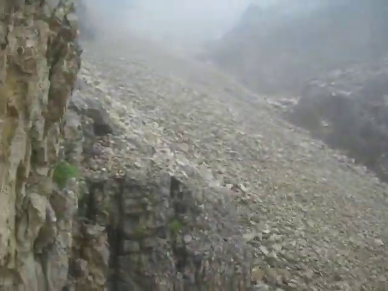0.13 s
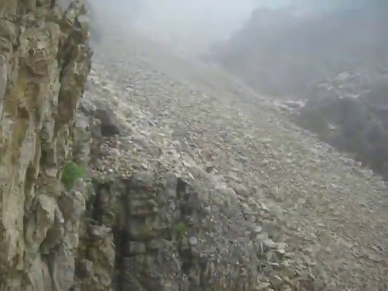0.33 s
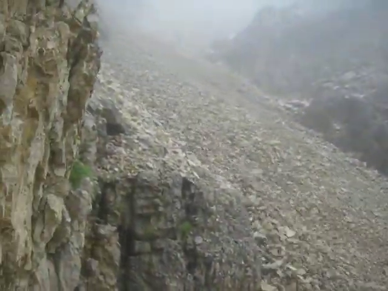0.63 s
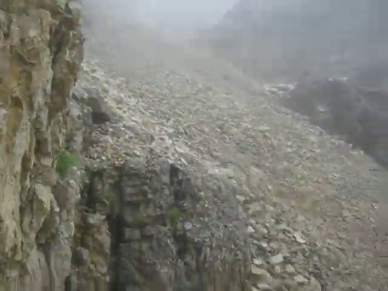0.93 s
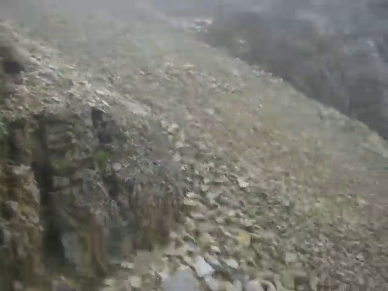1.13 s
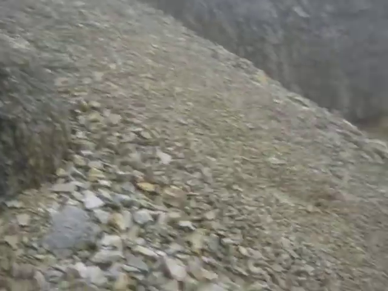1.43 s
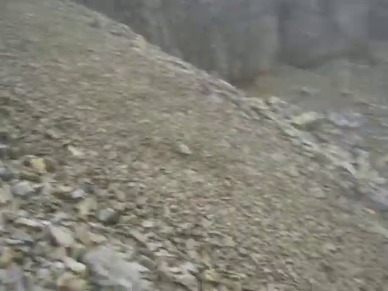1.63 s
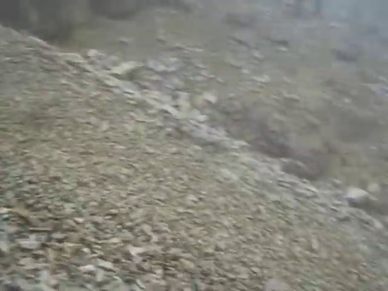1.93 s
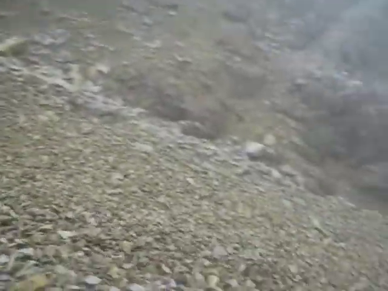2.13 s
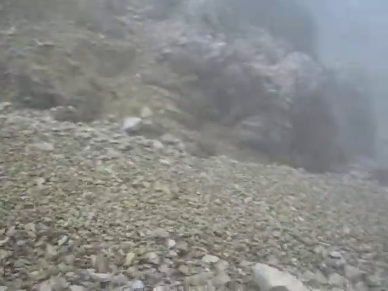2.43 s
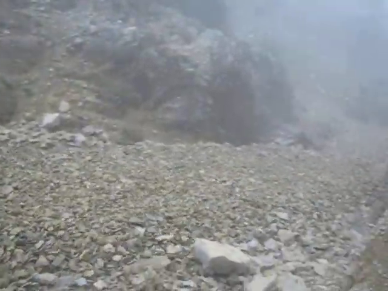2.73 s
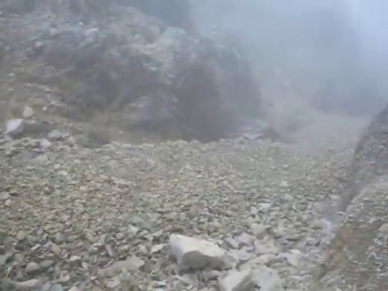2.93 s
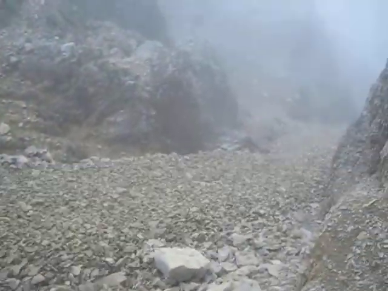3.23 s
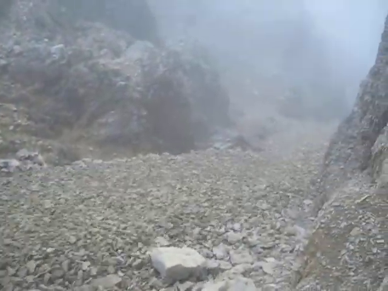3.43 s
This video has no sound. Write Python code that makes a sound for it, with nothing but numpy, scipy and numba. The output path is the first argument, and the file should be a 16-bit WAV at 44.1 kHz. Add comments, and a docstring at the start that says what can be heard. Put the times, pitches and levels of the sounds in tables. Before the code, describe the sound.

Scree slides down a mountain gully, small stones rattling and hissing over a faint rumble.

```python
"""A surging hiss and clatter: loose limestone scree sliding down a steep gully.
Thousands of small chips and fewer fist-sized stones knock and bounce, each ringing for milliseconds,
and merge with the hiss of the far slope. Heavy blocks thud in the bed over a low rumble.
A small camera's mono microphone hears it with little treble, turning towards the coarser stones below.
One thin, bright tick stands out."""
import sys
import numpy as np
from scipy import signal
from scipy.fft import rfft, irfft
from scipy.io import wavfile
from numba import njit

SR = 44100
rng = np.random.default_rng(int(sys.argv[2]) if len(sys.argv) > 2 else 0)


def to_wav(s):
    """Save 16-bit WAV."""
    ch = np.atleast_2d(s).T  # columns
    pcm = np.round(np.clip(ch, -1, 1) * 32767)  # PCM
    wavfile.write(sys.argv[1], SR, pcm.astype(np.int16))


N = 157437

# Modes of a flat stone: ratio to its pitch, level/dB
FLAT_STONE_MODES = [(.62, -3.5), (1, 2), (1.37, -2.5), (1.83, -7.5)]


def chips(level_db=-3):
    """Small chips in the gully: a bright, dense rattle whose level flickers slightly."""
    # Rattle colour at the microphone: f/Hz, gain/dB
    chip_colour = [(400, -23.5), (1000, -12), (2000, -4.5), (2800, -3), (3600, 0), (4700, 2.5), (5200, 1.5),
                   (5550, -2.5), (5900, -15.5), (6300, -43.5)]
    rattle = tumble(per_s=6000, low_hz=594, high_hz=6484, t60_s=.009, spread_db=3)
    return undb(level_db) * colour(rattle, chip_colour) * undb(.38 * wander(per_s=70))


def stones(level_db=-5):
    """Fist-sized stones: a lower clatter that grows as the microphone turns to the foot of the slope."""
    # Clatter colour at the microphone: f/Hz, gain/dB
    stone_colour = [(150, -18), (350, -17), (580, -8), (750, -10), (950, -6.5), (1400, -6.5), (2400, 1),
                    (3300, 1), (4500, -4), (6000, -37)]
    # Share of the larger stones in the flow: t/s, relative level/dB
    coarse_share = [(0, -1), (.5, -2), (.95, -3.5), (1.3, -3.5), (1.9, -1.5), (2.3, 0.5), (2.8, 3),
                    (3.15, 2.2), (3.57, 1.5)]
    clatter = tumble(per_s=3000, low_hz=250, high_hz=4490, t60_s=.011, spread_db=2)
    flicker = undb(.29 * wander(per_s=40))
    return undb(level_db) * colour(clatter, stone_colour) * curve(coarse_share) * flicker


def tumble(per_s, low_hz, high_hz, t60_s, spread_db, longest_hop_s=.025, bounce_db=-2.5):
    """A stream of stones of random size and distance; each strikes, hops and strikes again more softly."""
    when, pitch, damping, force, hop = rng.random((int(per_s * N / SR), 5)).T
    times = when * N / SR
    hz = low_hz + (high_hz - low_hz) * pitch
    decay_s = t60_s * 2 ** (2 * damping - 1)
    strength = undb(spread_db * np.minimum(-np.log(1 - force), 4))  # many soft, few hard
    strikes = knocks(times, hz, decay_s, strength)
    bounces = knocks(times + longest_hop_s * hop, hz, decay_s, strength)
    return strikes + undb(bounce_db) * bounces


def knocks(times, hz, t60_s, strength):
    """Struck stones: each rings in its own slightly irregular set of modes."""
    out = np.zeros(N)
    for ratio, db in FLAT_STONE_MODES:
        detune = 1 + .047 * rng.uniform(-.9, 1, len(times))
        polarity = rng.choice([-1, 1], len(times))
        out += ring(times, hz * ratio * detune, t60_s, strength * undb(db) * polarity)
    return out


@njit
def ring(times, hz, t60_s, strength):
    """One mode dying away: a damped sine for each contact."""
    out = np.zeros(N)
    for k in range(len(times)):
        start = int(times[k] * SR)
        pole = np.exp((2j * np.pi * hz[k] - np.log(1000) / t60_s[k]) / SR)
        phasor = strength[k] + 0j
        for i in range(start, min(N, start + int(t60_s[k] * SR))):
            out[i] += phasor.imag
            phasor *= pole
    return out


def thuds(rise_s=.0054, t60_s=.053, gain_db=1.5):
    """Heavy blocks land softly in the bed, their low modes quickly damped."""
    # Landings: t/s, relative level/dB, f/Hz
    landings = [(1.511, -32, 113), (1.672, -38, 127), (1.697, -39, 145), (1.913, -35.5, 148),
                (3.094, -36, 151), (3.235, -38, 110), (3.455, -45, 70)]
    out = np.zeros(N)
    for start, db, hz in landings:
        age = np.maximum(np.arange(N) / SR - start, 0)
        body = sum(undb(mode_db) * np.sin(2 * np.pi * (hz * ratio * age + rng.random()))
                   for ratio, mode_db in FLAT_STONE_MODES)
        envelope = (1 - np.exp(-age / rise_s)) * np.exp(-np.log(1000) * age / t60_s)
        out += undb(db + gain_db) * body * envelope
    return out


def far_slope(level_db=-5.5):
    """Countless distant contacts, scattered by the rock walls, blur into a smooth hiss."""
    # Hiss colour from a distance: f/Hz, gain/dB
    far_colour = [(250, -19.5), (600, -10), (1000, -6.5), (1600, -6.5), (2400, -1.5), (4600, 1.5),
                  (5200, -1), (5550, -8), (5900, -16.5), (6300, -40)]
    hiss = colour(rng.standard_normal(N), far_colour)
    return undb(level_db) * hiss * undb(.4 * wander(per_s=25))


def rumble():
    """The moving bed rumbles under the slide."""
    # Strength of the rumble: t/s, level/dB
    bed_level = [(0, -53), (1.05, -52.5), (1.2, -58), (1.4, -52), (2.4, -52), (2.95, -52), (3.25, -51.5),
                 (3.57, -51)]
    # Rumble colour: f/Hz, gain/dB
    bed_colour = [(20, -11), (55, -2), (80, -2.5), (135, 1.5), (190, 0.5), (250, -3), (350, -5.5),
                  (700, -15), (2000, -57.5)]
    return curve(bed_level) * colour(rng.standard_normal(N), bed_colour)


def tick(at_s=1.4233, impulse_db=-12.5, dullness=.4):
    """A lone, thin tick, brighter than the stones: one slightly softened impulse."""
    impulse = undb(impulse_db) * (np.arange(N) == int(at_s * SR))
    return signal.lfilter([1 - dullness], [1, -dullness], impulse)


def undb(db):
    """Decibels to gain."""
    return 10 ** (np.asarray(db) / 20)


def unit(x):
    """Scale to rms 1."""
    return x / np.sqrt(np.mean(x ** 2))


def curve(rows):
    """Gain through time from rows of t/s, level/dB."""
    return undb(np.interp(np.arange(N) / SR, *np.array(rows).T))


def colour(x, points):
    """Shape a sound by points of f/Hz, gain/dB; rms 1."""
    hz, db = np.array(points).T
    bin_hz = np.maximum(np.fft.rfftfreq(N, 1 / SR), 1)
    gain = undb(np.interp(np.log(bin_hz), np.log(hz), db))
    return unit(irfft(rfft(x) * gain, N))


def wander(per_s):
    """A glide between random values; rms 1."""
    steps = rng.standard_normal(1024)
    return unit(np.interp(np.arange(N) / SR * per_s, np.arange(len(steps)), steps))


def low_pass(x, hz):
    """Steep treble cut."""
    return signal.sosfilt(signal.ellip(10, .2, 80, hz, fs=SR, output="sos"), x)


def scene():
    """The whole slide from one spot in the gully, the same in both channels."""
    # Surges of the sliding scree: t/s, level/dB
    flow = [(0.0, -27), (0.39, -29), (0.42, -27.5), (0.54, -29), (0.66, -27.5), (0.9, -28), (0.93, -30.5),
            (1.02, -27), (1.05, -29), (1.11, -27.5), (1.17, -30.5), (1.29, -26), (1.38, -28), (1.47, -26.5),
            (1.62, -28.5), (1.74, -26.5), (1.77, -28), (2.34, -28), (2.37, -29.5), (2.58, -28),
            (2.61, -30.5), (2.64, -28), (2.88, -30.5), (2.94, -28.5), (3.24, -28), (3.3, -31), (3.36, -29),
            (3.57, -29)]
    slide = rumble() + thuds() + curve(flow) * (chips() + stones() + far_slope())
    return np.array([slide, slide])


def record(dry):
    """The camera keeps only a narrow band of the slide; one bright tick sounds above it."""
    narrow = low_pass(dry, hz=6250)
    return low_pass(narrow + tick(), hz=15800)


dry = scene()
out = record(dry)
to_wav(out)
```